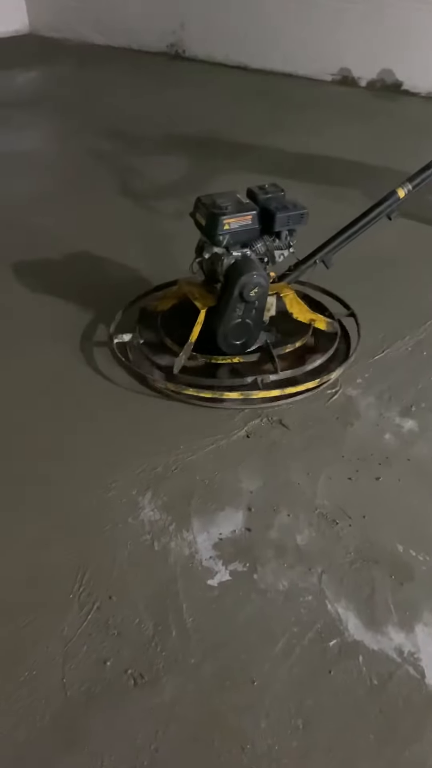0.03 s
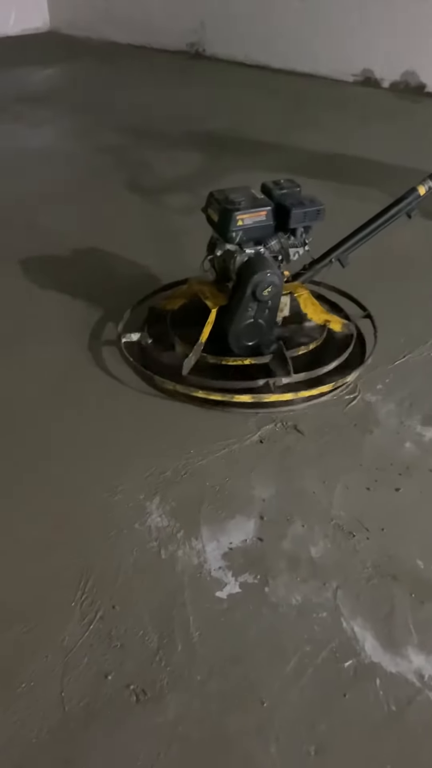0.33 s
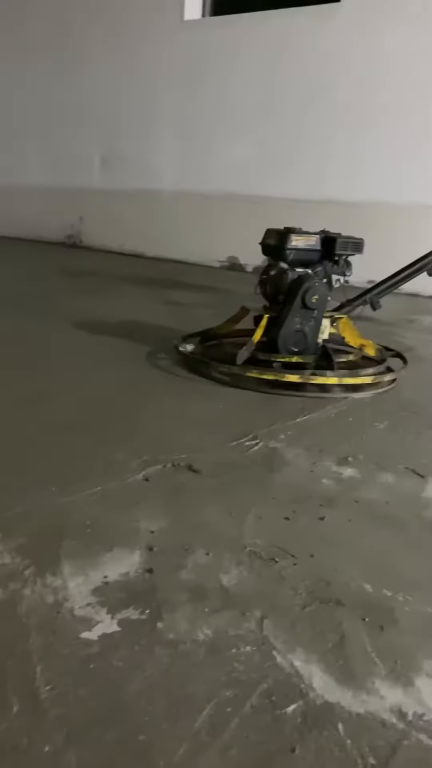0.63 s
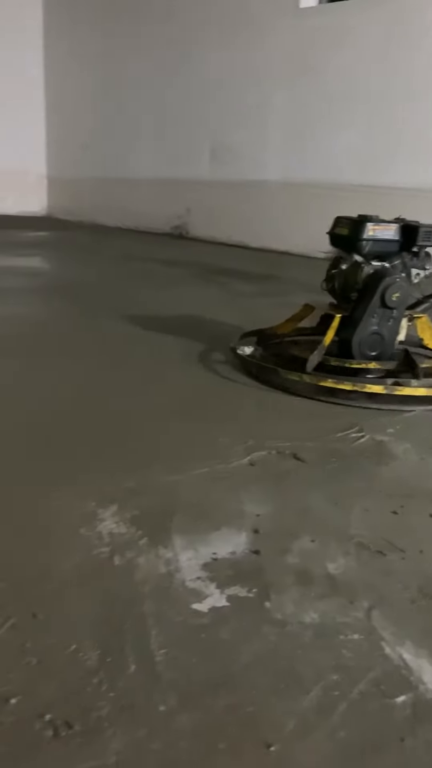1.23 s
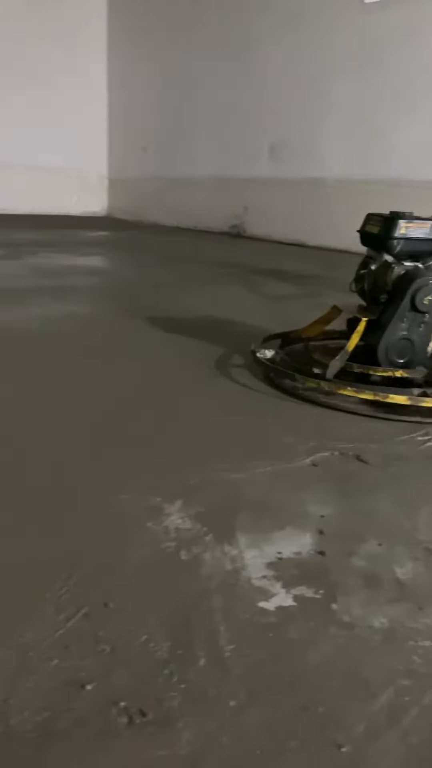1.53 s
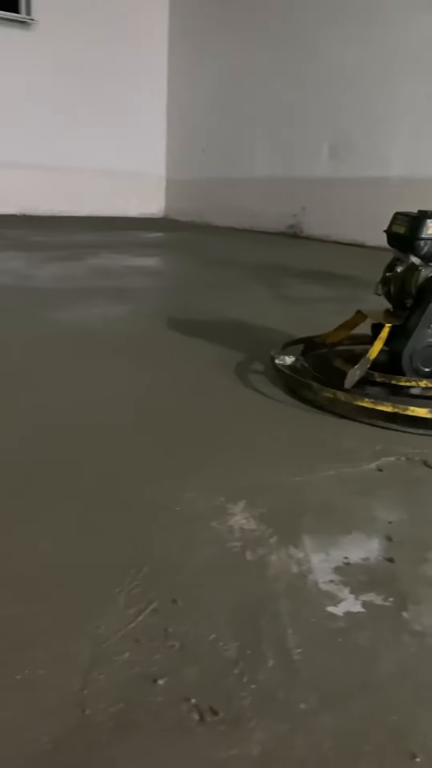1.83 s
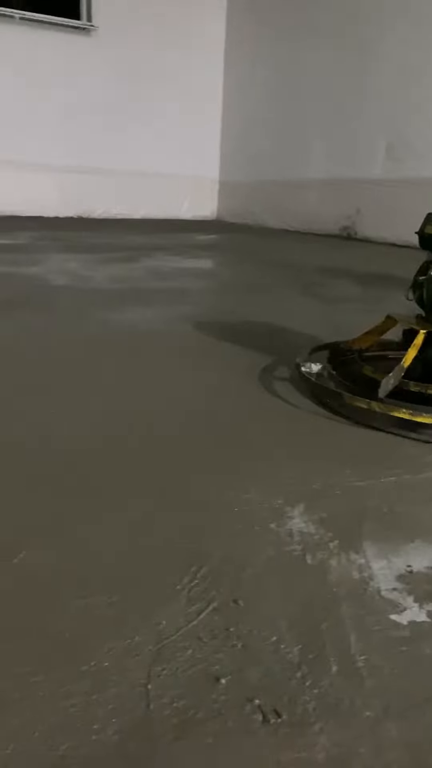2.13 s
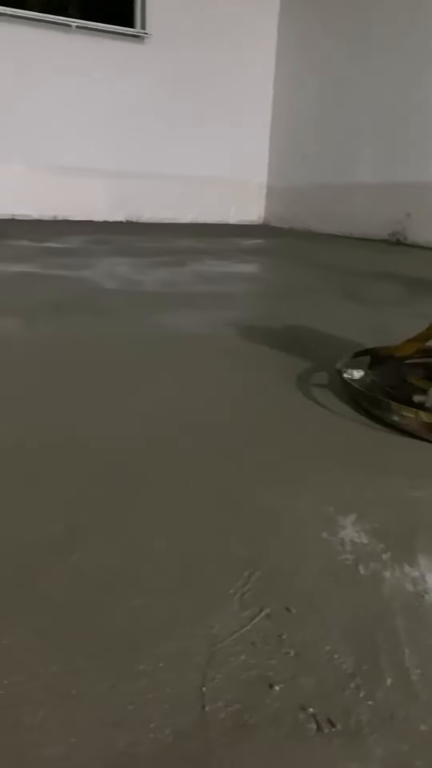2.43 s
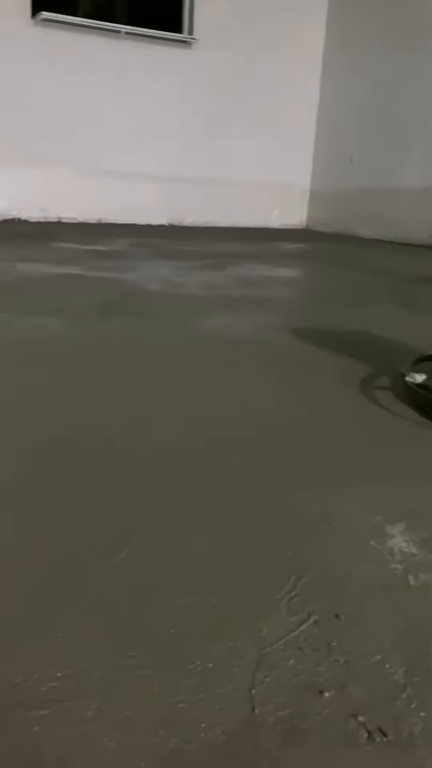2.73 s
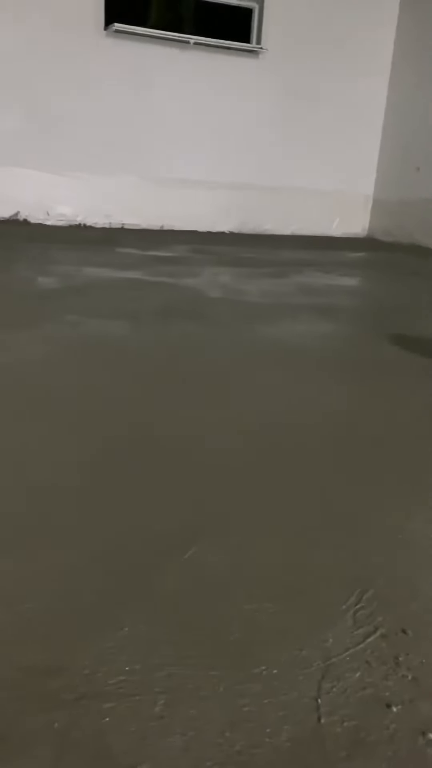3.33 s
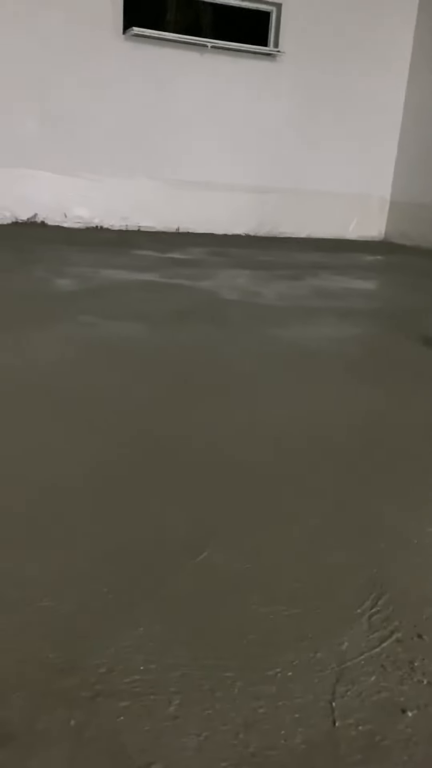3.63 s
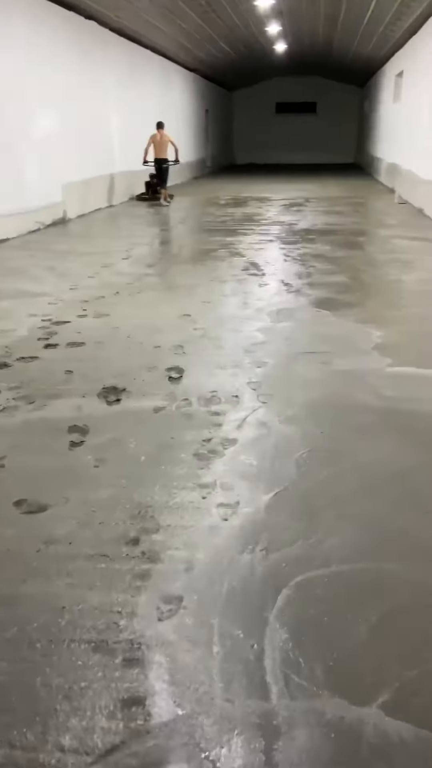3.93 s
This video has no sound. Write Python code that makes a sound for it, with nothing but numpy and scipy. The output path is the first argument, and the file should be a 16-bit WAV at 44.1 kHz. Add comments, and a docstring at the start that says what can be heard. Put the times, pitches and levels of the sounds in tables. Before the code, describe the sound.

A power trowel's petrol engine thumps and clatters steadily close by, its guard rattling and steel pan hissing over wet concrete. An empty warehouse smears the noise, and near the end the engine is abruptly higher-pitched.

```python
"""An engine thumps and clatters close to the microphone: a power trowel on wet concrete in an empty
warehouse. It is heard from three positions in turn: close, drifting past, far down the hall.
The single-cylinder four-stroke thumps three times a cycle, knocks and ticks its valves; the guard
rattles, and the steel pan scrapes and hisses on the floor. The long bare hall smears the clatter
into a wash."""
import sys
import numpy as np
from scipy import signal
from scipy.fft import rfft, irfft
from scipy.io import wavfile
from scipy.ndimage import uniform_filter1d

SR = 44100
rng = np.random.default_rng(int(sys.argv[2]) if len(sys.argv) > 2 else 0)


def put_to_file(sound):
    """Save the sound as 16-bit audio at rate SR, in the file named by the first command-line argument."""
    columns = np.atleast_2d(sound).T  # one column per channel
    safe = np.clip(columns, -1, 1)
    whole_steps = np.round(safe * 32767)
    wavfile.write(sys.argv[1], SR, whole_steps.astype(np.int16))


N = 176400

# moves from one microphone position to the next: time_s
MOVES_S = [.545, 3.688]
# where the engine is as each position opens: phase_cycles
START_PHASE = [.79, .93, .9]
# engine speed at each position: time_s, firing_hz
NEAR_SPEED = [(0, 22.97), (0.54, 22.71)]
PASS_SPEED = [(0.55, 22.87), (0.9, 23.15), (1.3, 23.12), (1.7, 23.18), (2.1, 23.06), (2.45, 22.8),
              (2.7, 22.82), (2.95, 23.14), (3.3, 23.04), (3.68, 23.2)]
FAR_SPEED = [(3.69, 29.94), (4, 30.15)]
# exhaust, intake and shake of the block: place_cycles, signed_strength, ring_hz, width_hz
THUMPS = [(0, -0.82, 259, 275), (.28, 0.81, 196, 286), (.48, -0.61, 205, 248)]
# engine orders (multiples of the firing rate), weighted within their register: order, relative_db
NEAR_ORDERS = [(1, -31), (2, -12), (3, -6.5), (4, -1), (5, -17), (6, -1.5), (7, -13), (8, -5), (9, -1.5),
               (10, -5), (11, -8), (12, -4.5), (13, -11), (14, -23), (15, -10.5), (16, -24), (17, -3),
               (18, -7), (19, -32), (20, -23)]
PASS_ORDERS = [(2, -4), (3, -0.5), (4, 0), (5, -1), (6, 1.5), (7, -22), (8, 0), (9, 0), (10, -12),
               (11, -10), (12, -4), (13, 0), (14, -10), (15, -18), (16, -18), (17, -13), (21, -20)]
FAR_ORDERS = [(2, -4), (3, -21), (4, -20), (5, 0), (6, -2), (7, -10), (8, -10), (9, -3), (10, -16),
              (11, -3.5), (12, -13), (13, -13), (14, -9), (16, -14), (17, -10), (20, -14), (21, -11)]
# base levels of the drone's three registers and the clatter's two bands:
# time_s, bass_db, body_db, upper_db, midrange_db, treble_db
NEAR_LEVELS = [(0, -23.5, -22, -28, -25.5, -21.5), (.54, -22, -29, -31, -25.5, -23)]
PASS_LEVELS = [(0.55, -28, -27, -40, -33, -29.5), (0.7, -27, -28.5, -30.5, -30.5, -29),
               (1.0, -26.5, -27.5, -31, -30, -28.5), (1.3, -26.5, -24, -30, -31, -28),
               (1.6, -25.5, -23, -30, -30, -28), (2.05, -24, -26, -26.5, -29.5, -26.5),
               (2.35, -25, -28, -27, -25.5, -26), (2.62, -25, -30, -28, -29, -27.5),
               (2.8, -26, -29, -30, -26.5, -27), (3.0, -24, -27, -23, -26.5, -25.5),
               (3.25, -25, -24.5, -27.5, -27, -27.3), (3.499, -25.5, -25.5, -25.5, -27, -28),
               (3.68, -24, -24.5, -26, -25.5, -26.5)]
FAR_LEVELS = [(3.69, -22, -33, -24.5, -26, -23.6), (4, -23, -33, -24.5, -24, -24)]
# added to the drone's base levels: bass_db, body_db, upper_db
REGISTER_LIFT_DB = [0, 0.5, 0]
# the machine crosses a node (dip) or antinode (swell): order, centre_s, half_length_s, gain_db
CROSSINGS = [(6, .65, .25, -4), (4, .7, .5, -5), (9, .7, .22, -11), (5, .8, .4, 3), (10, .85, .35, 9),
             (21, 1.0, .17, 21), (11, 1.1, .3, -9), (12, 1.17, .15, 7), (13, 1.23, .17, -14),
             (5, 2.1, .5, -8), (13, 2.55, .14, -7), (8, 2.58, .12, -9), (6, 2.72, .14, 3.5),
             (5, 2.92, .2, -14), (12, 3.3, .22, 4.5), (13, 3.37, .08, -6), (12, 3.62, .1, -8)]
# colour of clatter and scraping at each position: frequency_hz, relative_db
NEAR_COLOUR = [(350, 2), (550, -4), (800, 2.5), (1150, -7.5), (1800, -8), (2600, -7), (4000, -8.5),
               (5300, -12), (6500, -16), (10300, -20.5), (12500, -24.5), (15500, -30)]
PASS_COLOUR = [(350, -3.1), (500, -4.6), (700, -8.6), (950, -10.4), (1150, -11.9), (1450, -10.9),
               (1900, -13.0), (2400, -12.9), (3100, -13.9), (3550, -16), (4050, -16.2), (4600, -16.8),
               (5300, -18.7), (6200, -22.7), (8000, -24.7), (10300, -26.7), (12500, -30.1), (15500, -37.0)]
FAR_COLOUR = [(350, 2.5), (550, -3.5), (800, -3), (1150, -3.5), (1800, -9.5), (2600, -7), (4000, -11),
              (5300, -11.5), (6500, -17), (10300, -20.5), (12500, -25), (15500, -35)]
# modes of the scraping steel pan: pitch_hz, width_hz, boost_db
PAN_MODES = [(975, 45, 1.5), (1420, 180, 3), (3100, 240, 2.8)]
# width of diffuse sound at the stereo microphone: frequency_hz, side_minus_mid_db
MIC_WIDTH = [(200, -30), (500, -2), (900, -4), (1400, -3), (2000, -7), (2600, 2), (3400, -0.2), (4200, -5),
             (5300, -3.5), (6300, -1), (7000, 17.5), (7450, 27), (8300, 2.5), (9300, -3.5), (10400, -15),
             (11400, -3), (12400, 5.5), (13600, 22.0), (14800, 7), (15700, -9)]
# valve tick at each position: level_db
TICK_DB = [-44.5, -46, -59]
# spells of the guard rattling, humming and growling: start_s, end_s, ring_hz, width_hz, level_db
RATTLES = [(0, .539, 740, 340, -29.5), (0, .539, 392, 30, -35), (.69, 1.08, 500, 50, -35.5),
           (1.12, 1.5, 490, 60, -39), (2.226, 2.5, 440, 300, -35), (2.88, 3.1, 305, 70, -29)]
# hiss of the blades: time_s, centre_hz, level_db
HISS = [(.6, 3650, -46), (1.4, 3700, -44), (1.75, 3950, -39.5), (2.45, 3950, -39), (2.9, 4060, -39.5),
        (3.65, 4130, -40.5)]

BASS_EDGE_HZ, BODY_EDGE_HZ = 200, 264  # tops of the drone's lower two registers
SWAY_RATE_HZ, SWAY_SHARE, ECHO_PHASE_RAD, SWAY_REF_HZ = 3.88, .22, .55, 300
FIRING_SCATTER, DRONE_SIDE_DB, DRONE_LEFT_DB = .054, -20, -3
KNOCK_DB, KNOCK_SCATTER_DB, KNOCK_JITTER_S = -1.5, 2.5, .00036
HALL_T60_S, PATH_RATE_HZ, RUMBLE_DB = 2.82, 5, -38.5
SCRAPE_DB, SCRAPE_FROM_HZ, SCRAPE_FLUTTER_DB, SCRAPE_RATE_HZ, SCRAPE_PULSE = -3.5, 700, 2.04, 70, .12
SHIMMER_SHARE, SHIMMER_SPACING_HZ, SHIMMER_RATE_HZ = .12, 90, 14
CLATTER_LOW_HZ, TREBLE_EDGE_HZ, MIDRANGE_LEFT_DB = 294, 960, -1.4
TICK_HZ, TICK_WIDTH_HZ, TICK_SCATTER_DB, TICK_T60_S, TICK_ECHO_DB = 9200, 5200, 1.6, .2, -4
TICK_PLACE_CYCLES, TICK_JITTER_CYCLES = .12, .018
RATTLE_PLACE_CYCLES, RATTLE_FADE_S, RATTLE_NOISE = .08, .08, .6
HISS_WIDTH_HZ, HISS_DRIFT_HZ, HISS_RATE_HZ, HISS_FLUTTER_DB, HISS_SIDE_DB = 540, 60, 11, 1.3, -4
MOVE_GAP_S, MOVE_FADE_S, MOVE_FLOOR = .0062, .0075, .23
MIC_TOP_HZ = 15850

TIME_S = np.arange(N) / SR
FREQS_HZ = np.maximum(np.arange(N // 2 + 1) * SR / N, 1)


def amp(db):
    """Decibels to gain."""
    return 10 ** (np.asarray(db) / 20)


def unit(x):
    """Scale to rms 1."""
    return x / np.sqrt(np.mean(np.abs(x) ** 2) + 1e-18)


def curve(table, column=1):
    """One column of a time table at every sample."""
    rows = np.array(table, float)
    return np.interp(TIME_S, rows[:, 0], rows[:, column])


def colour(points):
    """Gain at every frequency from (Hz, dB) points."""
    hz, db = np.array(points, float).T
    return amp(np.interp(np.log(FREQS_HZ), np.log(hz), db))


def shape(x, gain):
    """Filter by a gain at every frequency."""
    return irfft(rfft(x) * gain, N)


def above(hz, steepness=8):
    """Gain of a high-pass."""
    return 1 / np.sqrt(1 + (hz / FREQS_HZ) ** steepness)


def ring(x, hz, width_hz):
    """Pass through one resonance."""
    return signal.lfilter(*signal.iirpeak(hz, hz / width_hz, fs=SR), x)


def walk(rate_hz):
    """Smooth random motion, rms 1."""
    hold = int(SR / rate_hz)
    steps = np.repeat(rng.standard_normal(512)[:N // hold + 2], hold)
    return unit(uniform_filter1d(uniform_filter1d(steps, hold), hold)[:N])


def each_cycle(cycle):
    """A fresh random value for every engine cycle."""
    return rng.standard_normal(256)[cycle.astype(int) % 256]


def burst(cycle, place, spread_cycles):
    """A rounded puff of noise once a cycle."""
    offset = (cycle - place + .5) % 1 - .5
    return np.exp(-.5 * (offset / spread_cycles) ** 2) * rng.standard_normal(N)


def thump_phase(order, firing_hz):
    """Phase of one order as the three ringing thumps set it."""
    hz, total = order * firing_hz, 0
    for place, strength, ring_hz, width_hz in THUMPS:
        detuning = (hz ** 2 - ring_hz ** 2) / (hz * width_hz)
        total += strength * np.exp(-2j * np.pi * order * place) / (1 + 1j * detuning)
    return total / abs(total)


def standing_waves(order):
    """Gain of one order as the machine crosses the hall's nodes and antinodes."""
    return amp(sum(db * np.exp(-((TIME_S - centre_s) / half_s) ** 2)
                   for crossed, centre_s, half_s, db in CROSSINGS if crossed == order))


def engine_drone(cycle, firing_hz, orders, levels):
    """The thumping engine's low orders, each swaying as the hall's standing waves shift."""
    mid, side = 0, 0
    rows = np.array(orders, float)
    registers = np.searchsorted([BASS_EDGE_HZ, BODY_EDGE_HZ], rows[:, 0] * firing_hz)
    gains = [amp(curve(levels, column=i + 1) + db) for i, db in enumerate(REGISTER_LIFT_DB)]
    for (order, db), register in zip(rows, registers):
        register_rms = np.sqrt(np.sum(amp(rows[registers == register, 1]) ** 2) / 2)
        gain = amp(db) / register_rms * gains[register] * standing_waves(order)
        tone = gain * np.exp(2j * np.pi * order * cycle) * thump_phase(order, firing_hz)
        height = order * firing_hz / SWAY_REF_HZ  # echoes scatter and sway higher orders more
        tone *= np.exp(1j * ECHO_PHASE_RAD * height * rng.standard_normal())
        sway = tone * (walk(SWAY_RATE_HZ) + 1j * walk(SWAY_RATE_HZ))
        share = SWAY_SHARE * height
        mid += (tone.real + share * sway.real) / np.sqrt(1 + 2 * share ** 2)
        side += amp(DRONE_SIDE_DB) * height * sway.imag
    lean = amp(DRONE_LEFT_DB * above(BASS_EDGE_HZ, steepness=4) / 2)  # to the right, above the bass
    uneven = 1 + FIRING_SCATTER * uniform_filter1d(each_cycle(cycle + .059), size=200)
    return uneven * np.array([shape(mid, lean) + side, shape(mid, 1 / lean) - side])


def knocks(cycle):
    """A sharp mechanical knock with each thump, never quite equal."""
    out = np.zeros(N)
    for place, strength, _, _ in THUMPS:
        due = np.flatnonzero(np.diff(np.floor(cycle - place)) > 0)
        late, loud = rng.standard_normal((256, 2))[:len(due)].T
        onsets = (due + late * KNOCK_JITTER_S * SR).astype(int) % N
        np.add.at(out, onsets, strength * amp(KNOCK_SCATTER_DB * loud))
    return out


def hall(x):
    """Dense reverberation, already built up; the echo paths trade places as the machine moves."""
    decay = amp(-60 * TIME_S / HALL_T60_S)
    weights = np.array([walk(PATH_RATE_HZ) for _ in range(4)])
    weights /= np.sqrt(np.sum(weights ** 2, axis=0))
    return sum(weight * unit(shape(x, rfft(rng.standard_normal(N) * decay))) for weight in weights)


def shimmer(x):
    """Narrow resonances come and go as the pan turns and the reflections shift."""
    out, grid_hz = x, np.arange(400) * SHIMMER_SPACING_HZ
    for _ in range(3):
        ripple = np.interp(FREQS_HZ, grid_hz, rng.standard_normal(len(grid_hz)))
        ripple *= above(TREBLE_EDGE_HZ, steepness=4)
        out = out + SHIMMER_SHARE * walk(SHIMMER_RATE_HZ) * shape(x, ripple)
    return out


def wash(blows, grit):
    """Knocks ring round the hall, joined in the treble by the pan scraping on concrete."""
    scrape_gain = amp(SCRAPE_DB) * above(SCRAPE_FROM_HZ, steepness=4)
    total_gain = np.hypot(amp(KNOCK_DB), scrape_gain)
    knocking = shape(hall(blows), amp(KNOCK_DB) / total_gain)
    scraping = shape(grit * rng.standard_normal(N), scrape_gain / total_gain)
    return shimmer(knocking + scraping)


def clatter(cycle, colour_points, levels):
    """The wash reaches the microphone from all sides, coloured by the steel pan's modes."""
    blows = knocks(cycle)
    pulse = 1 + SCRAPE_PULSE * np.cos(4 * np.pi * cycle)  # twice a cycle
    grit = unit(amp(SCRAPE_FLUTTER_DB * walk(SCRAPE_RATE_HZ)) * pulse)
    width = colour(MIC_WIDTH)
    steel = amp(sum(db / (1 + (2 * (FREQS_HZ - hz) / width_hz) ** 2) for hz, width_hz, db in PAN_MODES))
    tone = colour(colour_points) * steel * above(CLATTER_LOW_HZ) / np.hypot(1, width)
    mid = shape(wash(blows, grit), tone)
    side = shape(wash(blows, grit), tone * width)
    stereo = np.array([mid + side, mid - side])
    high = above(TREBLE_EDGE_HZ, steepness=16) ** 2
    midrange = unit(shape(stereo, 1 - high)) * amp(curve(levels, column=4))
    treble = unit(shape(stereo, high)) * amp(curve(levels, column=5))
    lean = amp(np.array([[MIDRANGE_LEFT_DB], [-MIDRANGE_LEFT_DB]]) / 2)
    return lean * midrange + treble


def hall_rumble():
    """Soft, steady low noise in the hall."""
    band = above(hz=69) * (1 - above(CLATTER_LOW_HZ))
    return amp(RUMBLE_DB) * unit(shape(rng.standard_normal(N), band))


def valve_tick(cycle):
    """The valve gear's bright tick, dead ahead of the microphone: uneven, blurred by early echoes."""
    place = TICK_PLACE_CYCLES + TICK_JITTER_CYCLES * each_cycle(cycle + .5)
    taps = burst(cycle, place, spread_cycles=.052) * amp(TICK_SCATTER_DB * each_cycle(cycle + .5))
    echoes = shape(taps, rfft(rng.standard_normal(N) * amp(-60 * TIME_S / TICK_T60_S)))
    blurred = unit(taps) + amp(TICK_ECHO_DB) * unit(echoes)
    tick = ring(ring(blurred, TICK_HZ, TICK_WIDTH_HZ), TICK_HZ, TICK_WIDTH_HZ)
    return unit(shape(tick, 1 / np.hypot(1, colour(MIC_WIDTH))))


def guard_rattle(cycle):
    """The sheet-metal guard rings in spells, knocked and shaken just after each firing."""
    count = np.floor(cycle - RATTLE_PLACE_CYCLES)
    taps = np.diff(count, append=count[-1])
    shaken = unit(taps) + RATTLE_NOISE * unit(burst(cycle, RATTLE_PLACE_CYCLES, spread_cycles=.09))
    out = 0
    for start_s, end_s, hz, width_hz, db in RATTLES:
        spell = np.clip(np.minimum(TIME_S - start_s, end_s - TIME_S) / RATTLE_FADE_S + .5, 0, 1)
        ringing = ring(ring(shaken, hz, width_hz), hz, 2 * width_hz)
        out += amp(db) * spell * unit(ringing)
    return out


def blade_hiss():
    """A broad, unsteady resonance of the rubbing steel that climbs as the pan bites."""
    centre_hz = curve(HISS) + HISS_DRIFT_HZ * walk(HISS_RATE_HZ)
    carrier = np.exp(2j * np.pi * np.cumsum(centre_hz) / SR)
    band = 1 / (1 + (2 * FREQS_HZ / HISS_WIDTH_HZ) ** 2)
    noises = shape(rng.standard_normal((2, 2, N)), band)
    mid, side = (unit(((real + 1j * imag) * carrier).real) for real, imag in noises)
    side *= amp(HISS_SIDE_DB)
    level_db = curve(HISS, column=2) + HISS_FLUTTER_DB * walk(HISS_RATE_HZ)
    return amp(level_db) * np.array([mid + side, mid - side])


def scene():
    """One machine from three microphone positions; the level dips briefly at each change."""
    positions = [(NEAR_SPEED, NEAR_ORDERS, NEAR_COLOUR, NEAR_LEVELS),
                 (PASS_SPEED, PASS_ORDERS, PASS_COLOUR, PASS_LEVELS),
                 (FAR_SPEED, FAR_ORDERS, FAR_COLOUR, FAR_LEVELS)]
    edges_s = [-1, *MOVES_S, 2 * N / SR]
    hiss = blade_hiss()
    out = 0
    for i, (speed, orders, colour_points, levels) in enumerate(positions):
        firing_hz = curve(speed)
        cycle = np.cumsum(firing_hz) / SR
        cycle += START_PHASE[i] - np.interp(speed[0][0], TIME_S, cycle)
        sound = engine_drone(cycle, firing_hz.mean(), orders, levels)
        sound += clatter(cycle, colour_points, levels) + hall_rumble()
        sound += amp(TICK_DB[i]) * valve_tick(cycle) + guard_rattle(cycle) + hiss
        inside_s = np.minimum(TIME_S - edges_s[i], edges_s[i + 1] - TIME_S)
        fade = np.clip((inside_s - MOVE_GAP_S / 2) / MOVE_FADE_S, MOVE_FLOOR, 1)
        out += sound * fade * (inside_s > 0)
    return out


def record(dry):
    """The microphone loses the very top of the treble."""
    return signal.sosfilt(signal.ellip(10, .2, 80, MIC_TOP_HZ, fs=SR, output="sos"), dry)


dry = scene()
out = record(dry)
put_to_file(out)
```